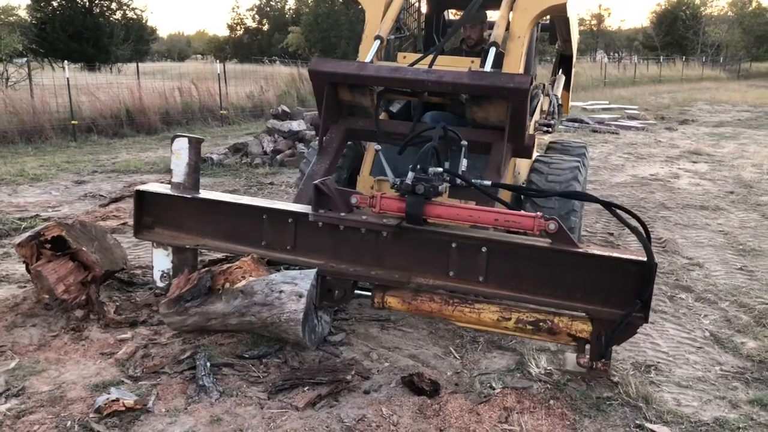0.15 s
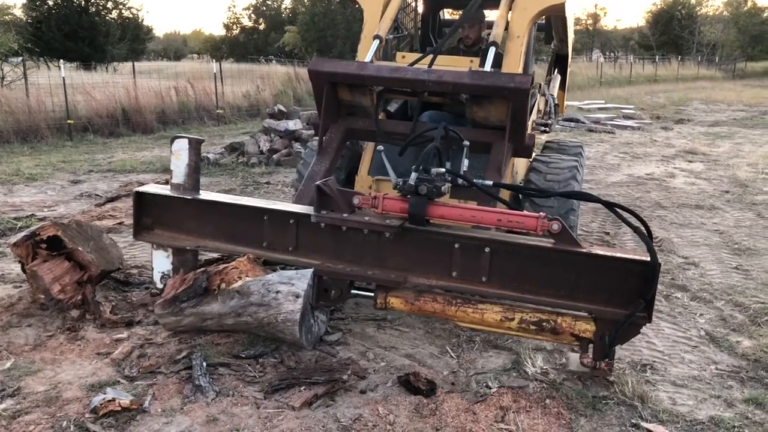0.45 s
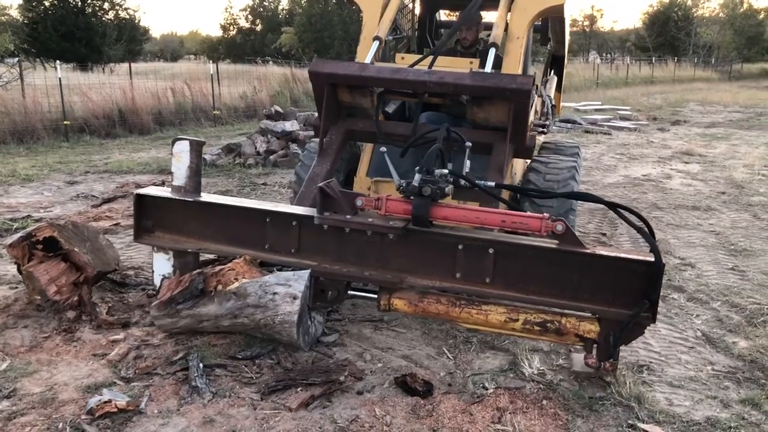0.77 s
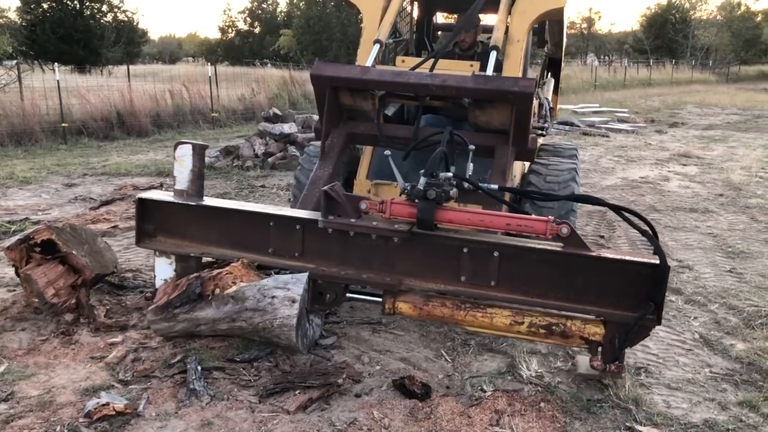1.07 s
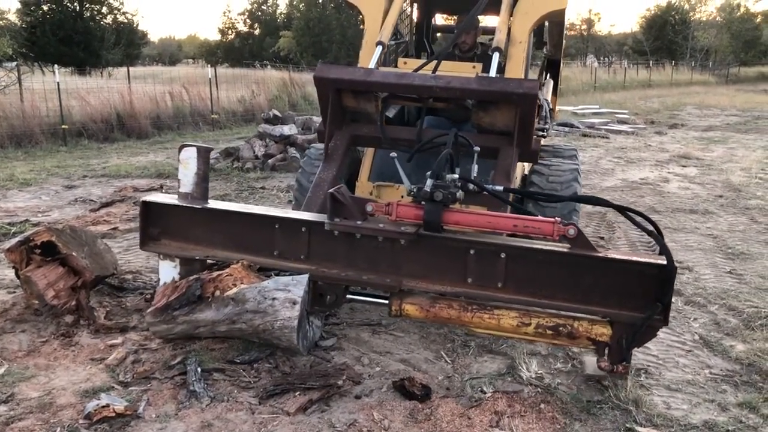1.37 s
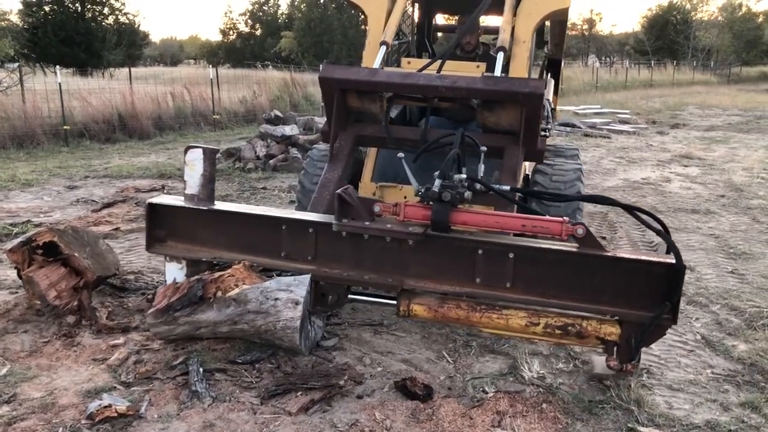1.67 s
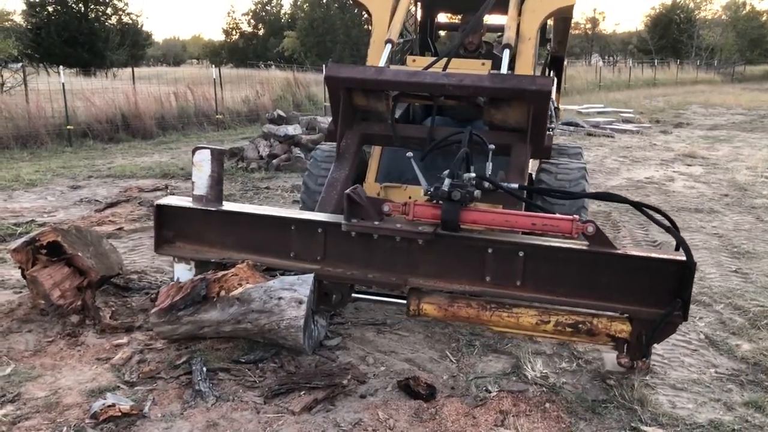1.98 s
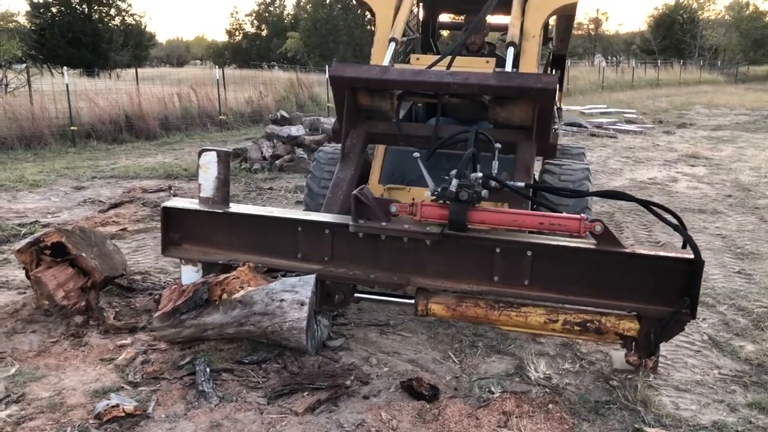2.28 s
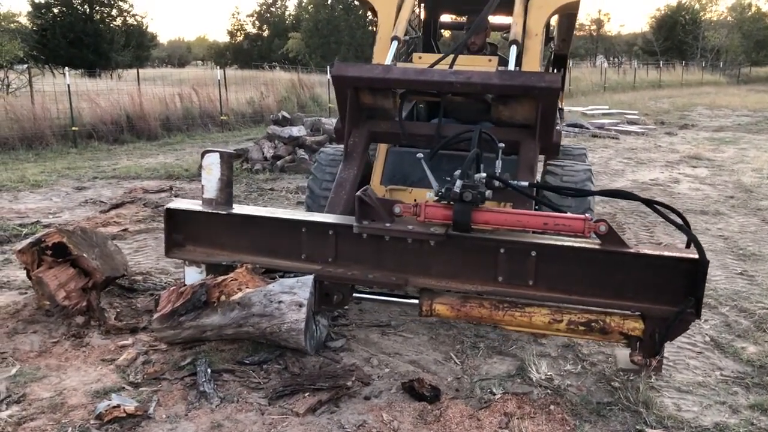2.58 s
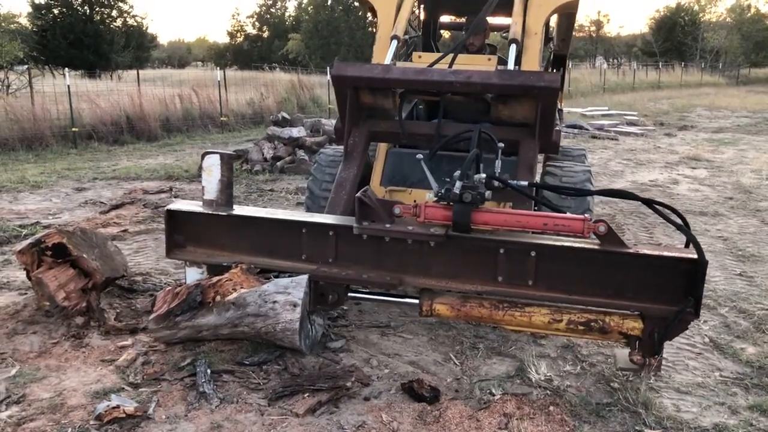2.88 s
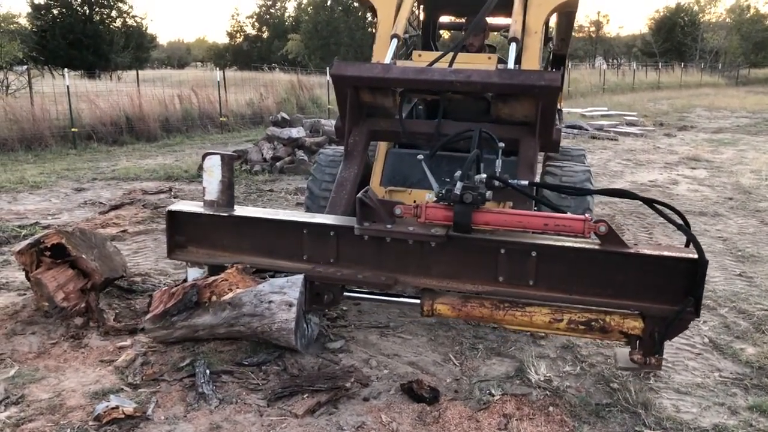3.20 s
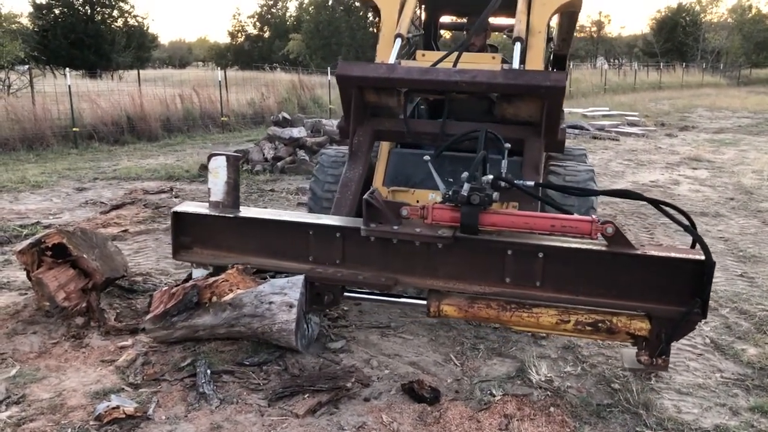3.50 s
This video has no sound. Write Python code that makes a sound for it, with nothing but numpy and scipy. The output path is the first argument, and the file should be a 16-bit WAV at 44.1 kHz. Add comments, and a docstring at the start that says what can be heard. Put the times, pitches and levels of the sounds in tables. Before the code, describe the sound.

A log splits under a hydraulic ram: a harsh juddering groan, sharp cracks and dull knocks, sputtering oil hiss with a rough whistle, then mostly steady diesel engine with small ticks, outdoors a few metres away.

```python
"""Outdoors, a few metres from a loader whose hydraulic splitter presses a log apart.
The diesel engine runs on as wavering tones over exhaust and clatter noise. The log judders along the
wedge in paired noise snaps over a groan and steel beam tones, then cracks and knocks dully as it opens.
Oil sputters through the valve as hiss with two strong surges and a rough, gliding whistle; later, beside
the engine, small splinters tick, a thin rush of oil passes and one last crack sounds."""
import sys
import numpy as np
from scipy import signal
from scipy.fft import rfft, irfft, next_fast_len
from scipy.io import wavfile
from scipy.ndimage import uniform_filter1d, map_coordinates

SR = 44100
rng = np.random.default_rng(int(sys.argv[2]) if len(sys.argv) > 2 else 0)


def generate_wav(signal):
    """Clip the signal to [-1, 1] and save it as 16-bit WAV at the path in sys.argv[1]."""
    frames = np.transpose(np.atleast_2d(signal))
    scaled = np.clip(frames, -1, 1) * 32767
    pcm = np.round(scaled).astype(np.int16)
    wavfile.write(sys.argv[1], SR, pcm)


N = 160965

# spectrum of brittle snaps and parting fibres: (frequency [Hz], relative level [dB])
CRACK_SPECTRUM = [(300, -22), (1200, -0.5), (3000, 1.5), (5500, -1.5), (9000, -5.5), (16000, -7.5)]
# spectrum of the wood's duller body: (frequency [Hz], relative level [dB])
WOOD_SPECTRUM = [(100, -36), (350, -2.5), (600, 2), (1100, -0.5), (1800, -2), (3000, -11.5), (6000, -19.5),
                 (16000, -40)]


def amp(db):
    """Decibels to gain."""
    return 10 ** (np.asarray(db) / 20)


def unit(x):
    """Scale to rms 1."""
    return x / np.sqrt(np.mean(x ** 2) + 1e-20)


def curves(rows):
    """One value per sample for each column after the time."""
    s, *cols = np.transpose(rows)
    return [np.interp(np.arange(N) / SR, s, c) for c in cols]


def wobble(rate):
    """A smooth random curve, rate knots a second."""
    knots = rng.standard_normal(int(N * rate / SR) + 4)
    return map_coordinates(knots, [np.arange(N) * rate / SR])


def filtered(x, response):
    """x through a gain given as a function of frequency in Hz."""
    m = next_fast_len(len(x) + 4096)  # padded against wrap-around
    return irfft(rfft(x, m) * response(np.fft.rfftfreq(m, 1 / SR)), m)[:len(x)]


def colour(x, points):
    """x shaped by (Hz, dB) points, at rms 1."""
    f, db = np.transpose(points)
    return unit(filtered(x, lambda hz: amp(np.interp(np.log(hz + 1), np.log(f), db))))


def noise(points, size=N):
    """Coloured noise of rms 1."""
    return colour(rng.standard_normal(size), points)


def add(track, s, sound):
    """Mix a sound into the track at time s."""
    part = track[max(0, round(s * SR)):][:len(sound)]
    part += sound[:len(part)]


def patchy(x, depth_db):
    """Give x small time-frequency patches of random gain, depth_db rms."""
    z = signal.stft(x, nperseg=512)[2]
    field = uniform_filter1d(rng.standard_normal(z.shape), size=3, axis=0)  # across frequency
    field = uniform_filter1d(field, size=9, axis=1)  # along time
    return unit(signal.istft(z * amp(depth_db * unit(field)), nperseg=512)[1][:N])


def hollowed(x, hz, depth):
    """x plus itself one period of hz later: peaks at the multiples of hz, dips between."""
    delayed = map_coordinates(x, [np.arange(N) - SR / hz])
    return (x + depth * delayed) / np.sqrt(1 + depth ** 2)


def reflected(x):
    """Add early reflections from the ground and the steel frame, as random signed taps."""
    echo_s, echo_db = .016, -5  # spread; summed level against the direct sound
    taps = np.zeros(SR // 10)
    for late, size in rng.random((12, 2)):
        taps[round((.001 + late * echo_s) * SR)] += size - .5
    return x + amp(echo_db) * signal.fftconvolve(x, taps / np.linalg.norm(taps))[:N]


def engine():
    """The firing tone, its family of orders, exhaust rumble and clatter that pulses with the firings."""
    # engine and pump tones: (multiple of the cycle rate, relative level [dB])
    orders = [(3, -49), (5, -51.5), (7, -42), (8, -41), (9, -42), (11, -43.5), (12, -40), (13, -41),
              (14, -42), (15, -41.5), (21, -47.5), (26, -46), (36, -46), (50, -53.5), (63, -53),
              (75, -49.5), (78, -48), (84, -46.5), (90, -49.5), (93, -49.5), (111, -53), (159, -55)]
    # slow swell of the whole engine: (time [s], gain [dB])
    engine_swell = [(0, -5.5), (.45, -3), (1.1, -1.5), (1.9, -0.5), (3, -0.5), (3.65, -1)]
    # low exhaust rumble: (frequency [Hz], relative level [dB])
    exhaust_spectrum = [(25, -52), (45, -20), (70, -7.5), (120, -8), (195, -2), (260, -6.5), (400, -12.5),
                        (600, -17.5), (1200, -45)]
    # mechanical clatter: (frequency [Hz], relative level [dB])
    clatter_spectrum = [(200, -8.5), (420, 0), (540, 2), (670, -3), (780, 1.5), (1000, -2), (1350, 1),
                        (1600, -4), (1750, -2), (2100, -8), (2500, -8.5), (3700, -11), (5800, -21),
                        (7800, -23.5), (10000, -29), (16000, -28)]
    cycle_hz, drift = 15.45, .002  # mean engine cycle rate, fractional wander
    firing_db, firing_wobble_db, order_wobble_db = -27.5, .3, 2
    exhaust_db, clatter_db, clatter_pulse = -34, -36, 0.2

    phase = 2 * np.pi * np.cumsum(cycle_hz * (1 + drift * wobble(5))) / SR
    firing = 6 * phase  # six firings a cycle
    out = np.sqrt(2) * amp(firing_db + firing_wobble_db * wobble(12)) * np.sin(firing)
    for order, db in orders:
        level = np.sqrt(2) * amp(db + order_wobble_db * wobble(7.04))
        out += level * np.sin(order * phase + 2 * np.pi * rng.random() + 0.28 * wobble(12))
    out += amp(exhaust_db) * noise(exhaust_spectrum)
    pulse = 1 + clatter_pulse * np.sin(firing) + 0.13 * np.sin(firing / 2)
    out += amp(clatter_db) * unit(noise(clatter_spectrum) * pulse)
    return out * amp(curves(engine_swell)[0])


def valve():
    """Sputtering oil hiss and sizzle with a rough gliding whistle, coloured by the steel pipes."""
    # oil sputtering: (time [s], relative hiss level [dB], relative top sizzle level [dB])
    sputter = [(.42, -72, -73), (.47, -53, -41), (.55, -39, -40), (.59, -57, -61), (.655, -42, -41),
               (.672, -27.5, -24), (.715, -23, -24), (.745, -35.5, -35.5), (.85, -37, -36),
               (.89, -44.5, -40), (.96, -40, -39), (1.005, -52, -47), (1.075, -35, -30), (1.13, -44, -44),
               (1.136, -28.5, -21), (1.23, -28, -21), (1.33, -29, -20.5), (1.36, -29, -31), (1.4, -32, -31),
               (1.48, -31.5, -34), (1.5, -42.5, -44), (1.55, -36.5, -40), (1.66, -42.5, -45),
               (1.68, -36.5, -35), (1.78, -39.5, -42), (1.865, -36, -40), (1.9, -48, -66), (2, -85, -85)]
    # body of the hiss: (frequency [Hz], relative level [dB])
    hiss_spectrum = [(500, -29), (1500, -3), (2500, -2), (3500, 0.5), (5200, -1), (6500, -0.5), (8000, -4),
                     (10000, -11), (15000, -21)]
    # top sizzle: (frequency [Hz], relative level [dB])
    sizzle_spectrum = [(4000, -30), (7000, -12), (8400, -1), (10000, -0.5), (12000, -2), (13300, 0.5),
                       (15300, 2)]
    # whistle: (time [s], mean pitch [Hz], relative first partial level [dB], relative second [dB])
    whistle = [(1.12, 2650, -80, -70), (1.145, 2584, -52, -25.5), (1.21, 2336, -46, -31),
               (1.26, 2236, -30.5, -28.5), (1.31, 2316, -29, -26.5), (1.365, 2070, -30.5, -35.5),
               (1.39, 2338, -27.5, -38), (1.455, 2788, -30, -39), (1.5, 2666, -41, -45),
               (1.55, 2356, -34, -50), (1.64, 2424, -43, -63), (1.86, 2450, -40, -51),
               (1.91, 2450, -80, -78)]
    # narrow resonances of the steel pipes: (frequency [Hz], width [Hz], boost [dB])
    pipe_modes = [(4270, 52, 6.5), (4460, 44, 8), (4755, 47, 10.5), (5440, 53, 4), (8280, 70, 7),
                  (9100, 70, 3), (11220, 32, 10), (13238, 70, 10)]
    # thin rush of oil as the ram travels on: (time [s], relative level [dB])
    rush = [(1.9, -70), (2.5, -69), (2.7, -65), (3.08, -52), (3.18, -68), (3.65, -64)]
    # spectrum of that rush: (frequency [Hz], relative level [dB])
    rush_spectrum = [(4000, -25), (6500, -1), (7600, 1), (8700, -5), (10000, -20)]
    flutter_hz, whistle_wander = 230, .02  # flutter bandwidth per partial number; fractional wander
    rough_db, ripple_db = 1.2, 2.5  # fast level flutter, patch depth
    comb = 0.51  # how strongly the whistling gap hollows the hiss between its partials

    hz, first_db, second_db = curves(whistle)
    hiss_db, sizzle_db = curves(sputter)
    phase = 2 * np.pi * np.cumsum(hz * (1 + whistle_wander * wobble(40))) / SR
    depth = comb * amp(np.minimum(first_db - hiss_db, 0))  # less where the whistle is below the hiss
    out = amp(hiss_db) * hollowed(patchy(noise(hiss_spectrum), ripple_db), hz, depth)
    out += amp(sizzle_db) * patchy(noise(sizzle_spectrum), ripple_db)

    def flutter(k):
        """Slow noise whose bandwidth sets the roughness of partial k."""
        return filtered(rng.standard_normal(N), lambda f: 1 / (1 + (f / (k * flutter_hz)) ** 4))

    for k, db in enumerate([first_db, second_db], 1):
        out += amp(db) * unit(flutter(k) * np.cos(k * phase) + flutter(k) * np.sin(k * phase))

    def pipes(f):
        """Gain of the pipes: a sum of resonant boosts in dB."""
        return amp(sum(db / (1 + (2 * (f - centre) / width) ** 2) for centre, width, db in pipe_modes))

    roughness = amp(rough_db * wobble(350) + 0.49 * wobble(35.1))
    return filtered(out, pipes) * roughness + amp(curves(rush)[0]) * noise(rush_spectrum)


def splinters():
    """Single thin ticks over a random crackle of parting fibres."""
    # splinters ticking: (time [s], relative level [dB], centre frequency [Hz])
    ticks = [(1.969, -35, 7040), (2.109, -35, 6500), (2.13, -37, 6940), (2.598, -26, 8100),
             (2.835, -30, 9100), (2.888, -29.5, 7000), (2.94, -29.5, 8500), (3.1665, -33, 6540),
             (3.305, -34, 13000), (3.3607, -24, 11000)]
    # fine fibres parting: (time [s], level [dB])
    crackle_level = [(0, -32), (.28, -37), (.4, -44.5), (.9, -42.5), (1.1, -40.5), (1.8, -42), (2, -56),
                     (3.65, -53)]
    tick_s, tick_octaves = 0.001, 0.79  # decay, half width of a tick's band
    breaks_per_s, spread_db = 70, 5
    out, t = np.zeros(N), np.arange(SR // 30) / SR
    for s, db, hz in ticks:
        band = lambda f: 1 / (1 + (np.log2((f + 1) / hz) / tick_octaves) ** 2)
        tick = unit(filtered(rng.standard_normal(len(t)), band))
        add(out, s, amp(db) * tick * (np.exp(-t / tick_s) + 0.071 * np.exp(-t / .007)))
    sizes = amp(spread_db * np.clip(rng.standard_normal(N), -2, 2))
    breaks = (rng.random(N) < breaks_per_s / SR) * sizes
    bursts = signal.fftconvolve(breaks, np.exp(-t / tick_s))[:N]
    return out + amp(curves(crackle_level)[0]) * unit(bursts * noise(CRACK_SPECTRUM))


def knocks():
    """The log's halves knock as they give way: its low modes ring under a dull crunch."""
    # knocks: (time [s], relative level [dB])
    knock_times = [(.205, -10), (0.255, -14.5), (1.035, -9.5)]
    # modes of the log: (frequency [Hz], relative level [dB], time to fall 60 dB [s])
    log_modes = [(248, -3, 0.085), (308.5, -1, 0.081), (373, -3.5, 0.078), (507, -10, .05),
                 (668, -10, 0.06), (892, -11, .05), (1220, -9.5, 0.045)]
    rise_s, crunch_db, crunch_s = 0.0033, -3.5, 0.013  # crunch level is relative to its knock
    out, t = np.zeros(N), np.arange(SR // 4) / SR
    for s, db in knock_times:
        ring = sum(amp(level - 60 * t / t60) * np.sin(2 * np.pi * (hz * t + rng.random()))
                   for hz, level, t60 in log_modes)
        crunch = amp(crunch_db) * noise(WOOD_SPECTRUM, size=len(t)) * np.exp(-t / crunch_s)
        add(out, s, amp(db) * (ring + crunch) * (1 - np.exp(-t / rise_s)))
    return out


def judder():
    """Stick and slip: each slip is a double burst of snap and groan noise, over wavering beam tones."""
    # log on the wedge: (time [s], slip rate [1/s], snap level [dB], relative groan and beam level [dB])
    slipping = [(0, 116, -18.5, -18), (.07, 123, -17.5, -17.5), (.13, 98, -20, -16.5), (.17, 100, -26, -16),
                (.2, 97, -38, -19), (.225, 97, -35, -26), (.265, 100, -31, -26.5), (.3, 100, -38, -36),
                (.36, 100, -47, -48), (.42, 100, -80, -72)]
    # bright snap: (frequency [Hz], relative level [dB])
    snap_spectrum = [(500, -9), (1500, 3), (3000, -2.5), (3800, -2), (4600, 3), (5800, -7), (7500, 0),
                     (8800, -10.5), (10300, -1), (12000, -11), (15000, -3.5)]
    # groan of the log: (frequency [Hz], relative level [dB])
    groan_spectrum = [(60, -45), (150, -11.5), (280, -3.5), (700, 0.5), (1300, -4.5), (2100, -8.5),
                      (3200, -13.5), (8000, -27)]
    # steel beam: (mean frequency [Hz], width [Hz], relative level per root hertz of width [dB])
    beam_modes = [(628, 15, 3.5), (813, 15.65, 6.5), (1508, 10.2, 0.5), (1564, 14, -10), (1886, 15.6, -9),
                  (2180, 20, -6), (4560, 120, -17.5), (7000, 40, -21), (7740, 30, -18), (10040, 40, -23)]
    jitter_s, decay_s, rub = .0004, 0.00063, 0.36  # timing spread, burst decay, steady rubbing
    second_s, second_size = .0027, 0.5  # delay and size of the second burst
    beam_db = -1  # against the groan

    rate, snap_db, groan_db = curves(slipping)
    starts = np.flatnonzero(np.diff(np.floor(np.cumsum(rate) / SR), prepend=-1)) / SR
    t = np.arange(SR // 50) / SR
    burst = np.exp(-t / decay_s)
    grip = np.full(N, rub, dtype=float)
    for s, (late, first, second) in zip(starts, rng.standard_normal((SR // 100, 3))):
        slip = s + jitter_s * late
        add(grip, slip, amp(1.5 * first) * burst)
        add(grip, slip + second_s, second_size * amp(2 * second) * burst)

    beam = np.zeros(N)
    for hz, width, db in beam_modes:
        phase = 2 * np.pi * np.cumsum(hz + .3 * width * wobble(3 * width)) / SR
        beam += amp(db) * np.sqrt(width) * np.sin(phase) * (1 + .3 * wobble(44.6))
    groan = colour(grip * rng.standard_normal(N), groan_spectrum) + amp(beam_db) * unit(beam)
    snaps = colour(grip * rng.standard_normal(N), snap_spectrum)
    return amp(snap_db) * snaps + amp(groan_db) * groan


def cracks():
    """Each crack is a bright snap and a short woody ring with a faint outdoor tail."""
    # cracks: (time [s], relative snap level [dB], relative wood ring level [dB], snap decay [s])
    crack_times = [(.207, -24, -28, .002), (0.2476, -14.5, -28, 0.0026), (.266, -21, -23, 0.0026),
                   (.28, -16, -24, 0.00074), (.361, -33, -36, .001), (0.431, -34, -25, .002),
                   (.519, -16, -20.5, 0.0053), (.562, -28, -30, 0.0016), (0.6202, -13, -17, 0.0015),
                   (.868, -34, -29.5, .002), (0.9253, -19, -29, 0.0021), (.958, -33, -29, .002),
                   (.97, -18.5, -28.5, 0.0022), (1.025, -8.5, -23, .001), (1.068, -18, -29, .001),
                   (1.084, -18, -29, 0.0021), (1.166, -28, -16.5, .002), (1.184, -20, -21, .002),
                   (1.368, -26, -24, .002), (1.479, -25, -24.5, .002), (1.674, -25, -25, 0.0025),
                   (1.686, -21, -25.5, .002), (1.733, -13, -20, 0.0016), (1.859, -27.5, -26, .002),
                   (3.5598, -25, -24, .002)]
    wood_s, tail_s = 0.0064, 0.027  # decays
    snap_tail_db, ring_tail_db = -21, -15.5
    out, t = np.zeros(N), np.arange(SR // 6) / SR
    tail = np.exp(-t / tail_s)
    onset = 1 - np.exp(-t / 0.00022)
    for s, snap_db, ring_db, snap_s in crack_times:
        snap = noise(CRACK_SPECTRUM, size=len(t)) * (np.exp(-t / snap_s) + amp(snap_tail_db) * tail)
        ring = noise(WOOD_SPECTRUM, size=len(t)) * (np.exp(-t / wood_s) + amp(ring_tail_db) * tail)
        add(out, s, (amp(snap_db) * snap + amp(ring_db) * ring) * onset)
    return out


def scene():
    """Machine and log, a few metres away in the open; only the valve gets separate reflections."""
    oil = amp(-1.06) * reflected(valve())
    return (engine() + judder() + oil + cracks() + knocks() + splinters())[None]


def record(dry):
    """The microphone saturates, rounding off the highest peaks, and a steep band limit cuts the top."""
    ceiling, top_hz = 0.64, 15850  # saturation amplitude, band limit
    soft = dry / (1 + np.abs(dry / ceiling) ** 6) ** (1 / 6)
    return np.array([filtered(ch, lambda hz: 1 / (1 + (hz / top_hz) ** 200)) for ch in soft])


dry = scene()
out = record(dry)
generate_wav(out)
```